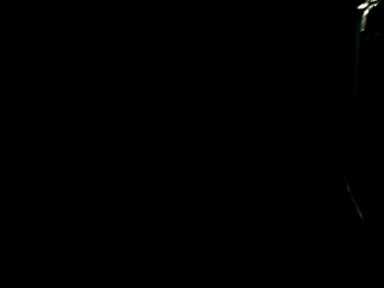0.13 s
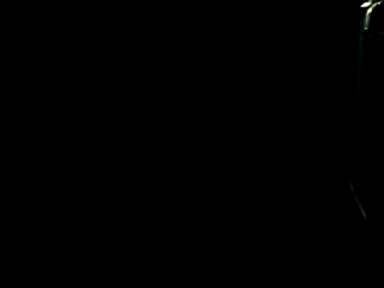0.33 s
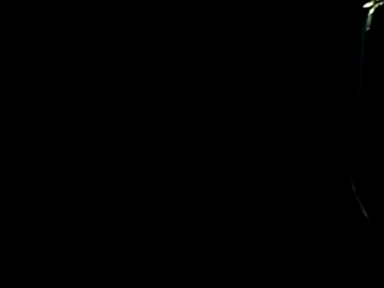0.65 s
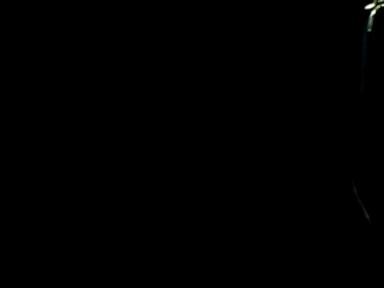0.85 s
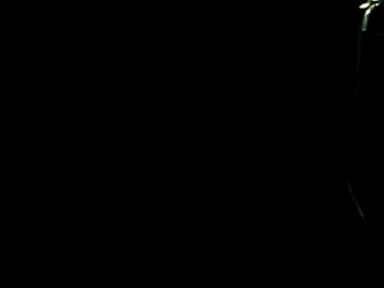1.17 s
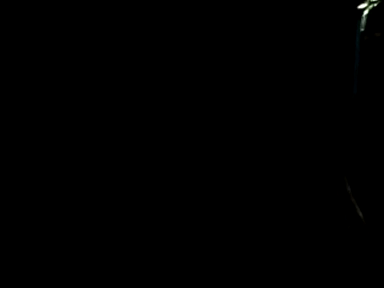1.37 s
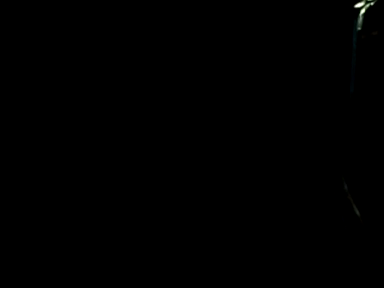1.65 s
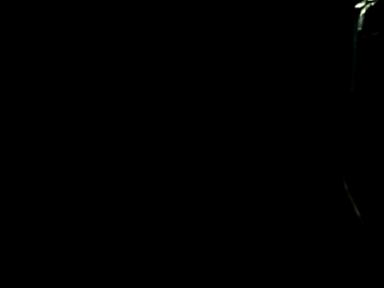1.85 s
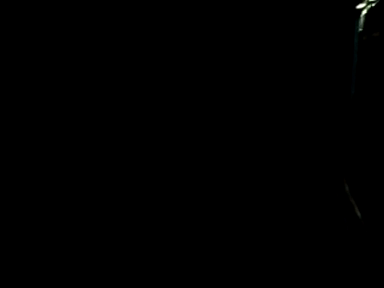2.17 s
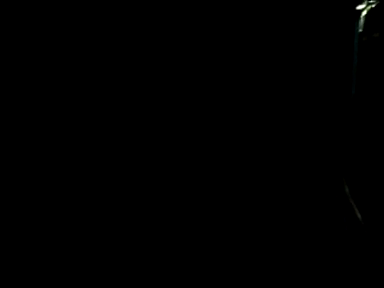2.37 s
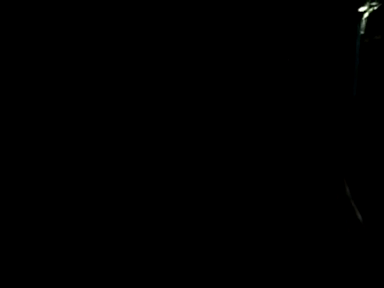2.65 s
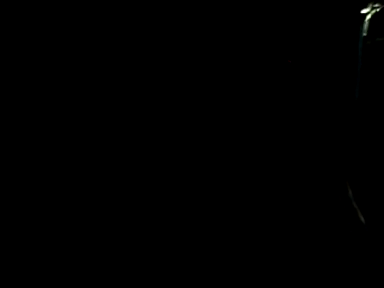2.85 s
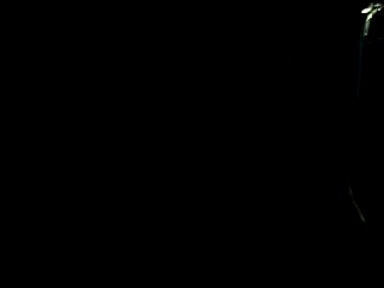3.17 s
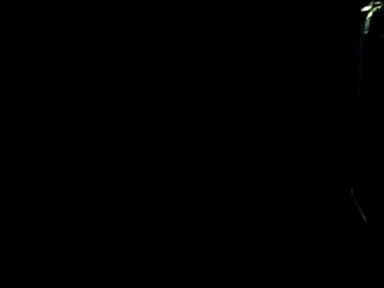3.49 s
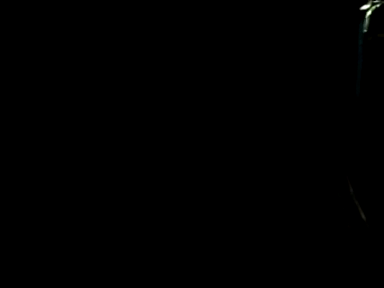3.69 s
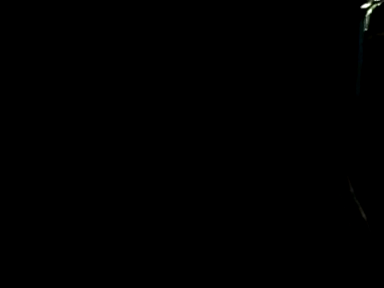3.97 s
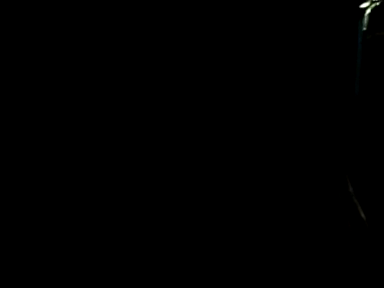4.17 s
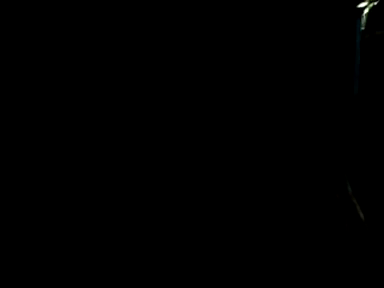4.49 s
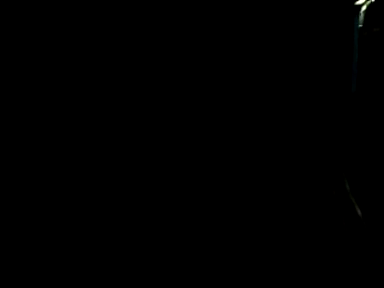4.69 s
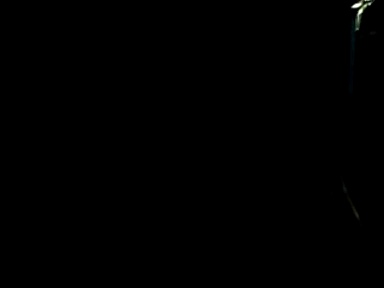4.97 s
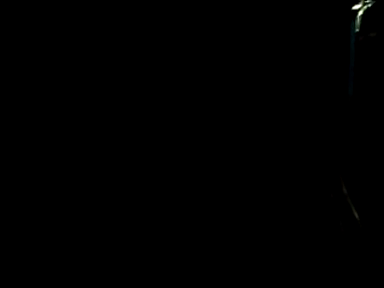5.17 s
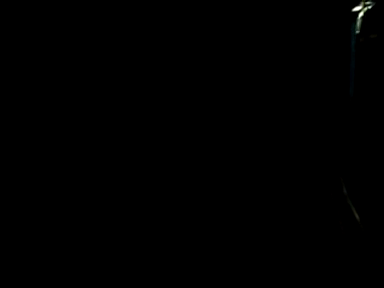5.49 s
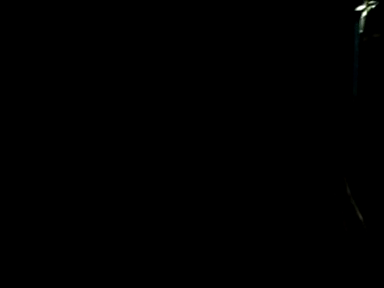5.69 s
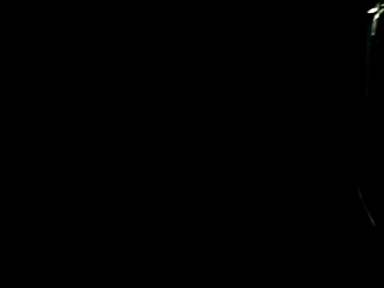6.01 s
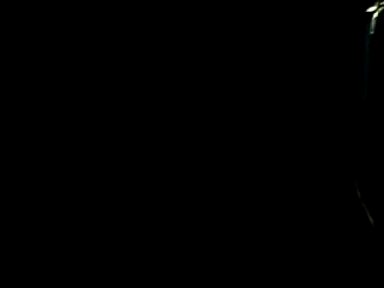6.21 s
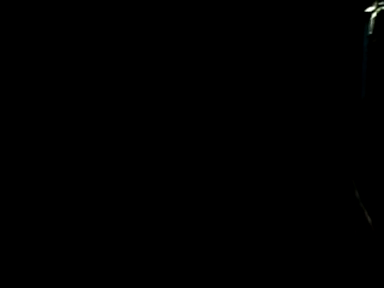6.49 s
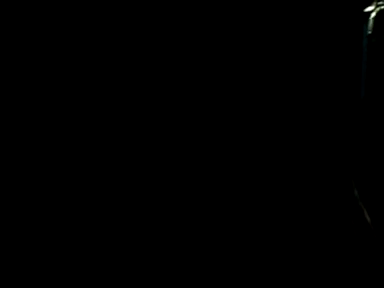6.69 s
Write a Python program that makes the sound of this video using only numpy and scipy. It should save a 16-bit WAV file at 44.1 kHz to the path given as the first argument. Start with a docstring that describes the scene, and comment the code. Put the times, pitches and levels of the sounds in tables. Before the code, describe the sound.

A train coach runs over rough track, heard from inside. A low rumble, a light hiss and faint singing steel continue throughout, swelling and easing slightly. After a soft stutter of knocks and small rattles at the start, hard wheel clacks land at about 1, 1.5 and 2.4 seconds. Each shakes loose metal fittings into a bright, jingling rattle, makes the coach body boom and leaves the rail faintly ringing. Another clack near 2.9 seconds runs straight into a quick burst of hollow knocks, and similar bursts come at about 3.4, 4.4 and 4.9 seconds. Softer, duller thumps fall unevenly between 4 and 6 seconds, with stray rattles among them. A firmer clack with a small metallic ring arrives at 6.4 seconds, followed by two lighter knocks as the rolling carries on to about 7 seconds.

```python
"""Train wheels hit rail joints in single clacks and stutter over worn patches in short runs of knocks,
heard inside a railway coach on rough track at night. Each blow shakes loose metal fittings into a
bright rattle and sets the coach body booming; hard clacks also leave the rail ringing.
Underneath are the steady rumble and hiss of rolling."""
import sys
import numpy as np
from scipy import signal
from scipy.fft import rfft, irfft, next_fast_len
from scipy.io import wavfile
from scipy.ndimage import uniform_filter1d

SR = 44100
rng = np.random.default_rng(int(sys.argv[2]) if len(sys.argv) > 2 else 0)


def transcribe(u):
    """Save the signal u as a 16-bit wav file named by the first command-line argument.

    u: samples, shape (n,) or (channels, n), limited to [-1, 1]; the rate is SR.
    q: integer samples, one column per channel.
    """
    v = np.clip(np.atleast_2d(u).T, -1, 1)
    q = np.round(v * 32767).astype(np.int16)
    wavfile.write(sys.argv[1], SR, q)


N = 302085
TIME = np.arange(N) / SR


def from_db(db):
    """Turn decibels into a gain."""
    return 10 ** (np.asarray(db) / 20)


def unit_power(x):
    """Scale a sound to an average power of one."""
    return x / np.sqrt(np.mean(x ** 2) + 1e-20)


def evened(x, span_s):
    """Hold the power near one over every short span."""
    return x / np.sqrt(np.abs(uniform_filter1d(x ** 2, int(span_s * SR))) + 1e-20)


def in_time(rows):
    """Join timed rows with straight lines, one curve per level column."""
    times, *columns = np.transpose(rows)
    return [np.interp(TIME, times, column) for column in columns]


def colour(x, spectrum, peaks=()):
    """Filter a sound with a smooth tone curve and resonant peaks on top."""
    size = 2 * next_fast_len(x.shape[-1] // 2 + SR // 16)
    hz = np.maximum(np.arange(size // 2 + 1) * SR / size, 1)
    points = np.array(spectrum)
    db = np.interp(np.log(hz), np.log(points[:, 0]), points[:, 1])
    for centre, width, lift in peaks:
        db = db + lift / (1 + (2 * (hz - centre) / width) ** 2)
    # Minimum phase: nothing rings before it is hit.
    cepstrum = irfft(db * np.log(10) / 20)
    cepstrum[1:size // 2] *= 2
    cepstrum[size // 2 + 1:] = 0
    return irfft(rfft(x, size) * np.exp(rfft(cepstrum)), size)[..., :x.shape[-1]]


def resonate(x, hz, width_hz):
    """Ring at one pitch, with a gain of one at the peak."""
    radius = np.exp(-np.pi * width_hz / SR)
    feedback = [1, -2 * radius * np.cos(2 * np.pi * hz / SR), radius ** 2]
    return signal.lfilter(np.array([1, 0, -1]) * (1 - radius ** 2) / 2, feedback, x + 1e-18)


def noise_bursts(count, rise_s, t60, tail_db, tail_t60):
    """Noise that swells, dies and leaves a weaker tail; t60 is the seconds it takes to fall 60 dB."""
    t = TIME[:SR // 2]
    fall = from_db(-60 * t / t60) + from_db(tail_db - 60 * t / tail_t60)
    return rng.standard_normal((count, len(t))) * (1 - np.exp(-t / rise_s)) * fall


def placed(bursts, times, levels_db):
    """Lay each burst at its time; its level is its energy spread over 20 ms."""
    out = np.zeros(N)
    for s, burst, db in zip(times, bursts, levels_db):
        start = int(s * SR)
        burst = burst * from_db(db) * np.sqrt(.02 * SR / np.sum(burst ** 2))
        out[start:start + len(burst)] += burst[:N - start]
    return out


def grains(per_s, spread_db):
    """Tiny random contacts of uneven size."""
    touches = rng.random(N) < per_s / SR
    return touches * rng.standard_normal(N) * from_db(spread_db * rng.standard_normal(N))


# Steel parts that sing. Each row: pitch in Hz, relative level in dB.
STEEL_TONES = [(1640, -4.5), (1945, -11), (2525, -13.5), (2920, -22), (3190, -21), (4100, -13), (4850, -18)]


def singing_steel():
    """Steel parts sing with the rolling, each growing louder and softer at random."""
    out = np.zeros(N)
    for hz, db in STEEL_TONES:
        wander = np.interp(TIME * 4.3, np.arange(400), rng.standard_normal(400))  # 4.3 turns a second
        tone = unit_power(resonate(rng.standard_normal(N), hz, width_hz=34))
        out += from_db(db + 7 * wander) * tone
    return out


# Floor and wall panels that roar and knocks pass through. Each row: pitch in Hz, width in Hz, lift in dB.
PANEL_PEAKS = [(214, 26, 3.5), (256.8, 21.6, 6.5), (305.6, 23, 3.5), (353.4, 9.8, 5.5), (412, 10, 6),
               (495, 23, 2), (850, 43, -2), (1370, 60, -0.5), (1520, 80, 5.5)]
# Tone curves of the roar and the hiss. Each row: frequency in Hz, relative level in dB.
ROAR_CURVE = [(20, -30), (100, -5), (170, 0.5), (260, -2), (380, -5.5), (520, -7.5), (800, -12),
              (1150, -22), (1700, -34.5), (2600, -36.5), (4500, -39), (11000, -86.5)]
HISS_CURVE = [(300, -3.5), (1500, 4), (3200, -1.5), (4200, -4), (4900, -7.5), (6000, -8), (8000, -6.5),
              (9000, -9.5), (9900, -6.5), (11000, -27)]
# How strong the rolling is. Each row: time in seconds, then roar and hiss in relative dB.
ROLLING_LEVELS = [(0.0, -34.5, -48), (0.36, -34, -45), (0.92, -33, -47.5), (1.18, -37, -51),
                  (1.95, -39, -52.5), (2.61, -34, -46.5), (2.96, -33, -48.5), (3.97, -36.5, -52.5),
                  (4.48, -33, -47.5), (5.36, -34.5, -48.5), (6.62, -32.5, -46.5), (6.85, -32, -48)]


def rolling():
    """Rough wheel treads roar through the panels; small parts fizz and sing with the shaking."""
    roar_db, hiss_db = in_time(ROLLING_LEVELS)
    roar = evened(colour(grains(per_s=9000, spread_db=1.27), ROAR_CURVE, PANEL_PEAKS), span_s=0.089)
    hiss = unit_power(colour(grains(per_s=25000, spread_db=3.5), HISS_CURVE))
    singing = from_db(hiss_db - 9.5) * singing_steel()
    return from_db(roar_db + .5) * roar + from_db(hiss_db - .5) * hiss + singing


def coach_body(modes, span_s):
    """Uneven rails keep the low resonances of the coach going."""
    boom = sum(from_db(db) * resonate(rng.standard_normal(N + SR), hz, width) for hz, width, db in modes)
    lowpass = signal.butter(2, 1.28 * modes[-1][0], fs=SR, output="sos")
    return evened(signal.sosfilt(lowpass, boom)[SR:], span_s)


def jolt_swell(times, force_db, rise_s, t60=1.0):
    """The heavy body takes up each blow slowly and gives it back slowly; the energies add."""
    t = TIME[:SR]
    response = (1 - np.exp(-t / rise_s)) * from_db(-60 * t / t60)
    energy = np.bincount((times * SR).astype(int), from_db(force_db) ** 2, N)
    return np.sqrt(np.abs(signal.fftconvolve(energy, response ** 2)[:N]))


# The body's boom and deeper heave. Each row: pitch in Hz, width in Hz, relative level in dB.
BODY_BOOM = [(84.1, 7.8, -2), (112.4, 6.3, -1)]
BODY_HEAVE = [(27.3, 15, 1.5), (43.2, 6, 9)]
# Dips where the coach lurches on its springs. Each row: start in seconds, strength in dB.
TRACK_DIPS = [(.98, -23), (1.46, -23), (2.54, -28), (3.44, -23), (4.62, -28), (6.51, -24.5)]


def rumble(times, jolt_db):
    """The body booms and heaves with the rolling and swells after each jolt; dips add to the heave."""
    roar_db, _ = in_time(ROLLING_LEVELS)
    shake = jolt_swell(times, jolt_db, rise_s=0.015)
    lurch = jolt_swell(*np.transpose(TRACK_DIPS), rise_s=0.014)
    sway = np.hypot(lurch, from_db(-12) * shake)
    boom = np.hypot(from_db(roar_db - 3), shake) * coach_body(BODY_BOOM, span_s=0.15)
    heave = np.hypot(from_db(roar_db - 2), sway) * coach_body(BODY_HEAVE, span_s=0.11)
    return boom + heave


# Single metal parts that tick or ring. Each row: start in seconds, pitch in Hz, width in Hz,
# level in dB, rise in seconds, seconds to fall 60 dB.
METAL_CHINKS = [(3.362, 3120, 2200, -45.5, .001, 0.02), (3.94, 4540, 220, -54, .015, 0.27),
                (6.401, 3330, 110, -41, .005, 0.56)]


def chinks(rows):
    """Each steel part rings in a cluster of close pitches that beat together."""
    t, bursts = TIME[:SR], []
    for _, hz, width, _, rise_s, t60 in rows:
        half_width = np.clip(width, .03 * hz, 1.2 * hz) / 2
        band = signal.butter(2, [hz - half_width, hz + half_width], "band", fs=SR, output="sos")
        cluster = signal.sosfilt(band, rng.standard_normal(2 * SR))[SR:]
        bursts.append(evened(cluster, span_s=.06) * (1 - np.exp(-t / rise_s)) * from_db(-60 * t / t60))
    return placed(bursts, [row[0] for row in rows], [row[3] for row in rows])


def loose_parts(bursts, curve, range_hz, width_hz, lift_db, count):
    """Every burst sets a different handful of parts ringing."""
    pitches = rng.uniform(*range_hz, (len(bursts), count))
    return [colour(burst, curve, [(hz, width_hz, lift_db) for hz in row])
            for burst, row in zip(bursts, pitches)]


# Tone curves of the loose fittings. Each row: frequency in Hz, relative level in dB.
RATTLE_CURVE = [(200, -16), (800, 6.5), (1700, 4), (2400, 1.5), (3300, 2.5), (4300, -1), (4900, 0.5),
                (5900, -3.5), (6900, -7.5), (7600, -3), (10500, -29.5)]
JINGLE_CURVE = [(1000, -41), (5000, -6.5), (7500, -7), (8900, 2), (9400, 1.5), (10000, 2), (10600, -7),
                (12000, -47)]
# Fittings that shift between blows. Each row: start in seconds, then rattle and jingle in relative dB.
STRAY_RATTLES = [(.29, -45, -69), (.58, -41, -45), (0.908, -39.5, -47), (2.359, -38, -44), (4.65, -52, -54),
                 (4.824, -44.5, -46), (5.045, -38.5, -49), (5.591, -49, -54), (5.839, -36.5, -41),
                 (6.24, -59, -49.5), (6.589, -55, -45)]


def fittings(times, rattle_db, jingle_db):
    """Loose metal rattles after a jolt; the lightest parts swell later and jingle."""
    shakes = noise_bursts(len(times), rise_s=0.012, t60=0.33, tail_db=-15.5, tail_t60=0.73)
    rattle = loose_parts(shakes, RATTLE_CURVE, range_hz=(1204, 8470), width_hz=74, lift_db=5.5, count=16)
    shivers = noise_bursts(len(times), rise_s=0.02, t60=0.44, tail_db=-19, tail_t60=0.79)
    jingle = loose_parts(shivers, JINGLE_CURVE, range_hz=(9140, 10300),
                         width_hz=110, lift_db=3.5, count=5)
    return placed(rattle, times, rattle_db + 0.46) + placed(jingle, times, jingle_db)


# The struck rail. Each row: pitch in Hz, width in Hz, level in dB relative to the crack,
# rise in seconds, seconds to fall 60 dB.
RAIL_TONES = [(2107, 83, -25.5, 0.03, 0.95), (6880, 310, -25, 0.056, 0.55)]


def rail_ring(clacks, hard_crack_db=-29):
    """The rail rings on after each hard clack, in proportion to its crack."""
    return chinks([(s, hz, width, crack_db + db, rise_s, t60)
                   for s, _, crack_db, *_ in clacks if crack_db > hard_crack_db
                   for hz, width, db, rise_s, t60 in RAIL_TONES])


def with_push(bursts, push_db, delay_s):
    """The wheel's own push stands out of the scattered ringing as one sharp pulse."""
    pulse = np.arange(bursts.shape[1]) == int(delay_s * SR)
    return bursts + from_db(push_db) * np.linalg.norm(bursts, axis=1, keepdims=True) * pulse


# Tone curve of a hollow knock. Each row: multiple of its pitch, relative level in dB.
KNOCK_CURVE = [(.17, -39.5), (.43, -13.5), (.72, -1), (1.1, 0), (1.6, -5.5), (2.1, -19.5), (3.1, -26.5),
               (7, -43.5), (23, -84)]
# Tone curve of the crack on a rail end. Each row: frequency in Hz, relative level in dB.
CRACK_CURVE = [(100, -5), (180, 11), (300, -16.5), (550, 4.5), (900, 1.5), (1150, -7.5), (1800, -13),
               (2500, -18), (10000, -36.5)]


def wheel_blows(times, knock_db, crack_db, pitch_hz):
    """A hollow knock comes through the floor as the wheel dips; a square hit on a rail end cracks."""
    dip_s = .004
    thuds = noise_bursts(len(times), rise_s=0.00053, t60=0.2, tail_db=-4.0, tail_t60=0.27)
    thuds = with_push(thuds, push_db=-4.5, delay_s=0.00599)
    knocks = [colour(thud, np.array(KNOCK_CURVE) * [hz, 1], PANEL_PEAKS)
              for thud, hz in zip(thuds, pitch_hz)]
    snaps = noise_bursts(len(times), rise_s=0.00057, t60=0.099, tail_db=-9.5, tail_t60=0.18)
    snaps = with_push(snaps, push_db=-12.5, delay_s=0.00144)
    cracks = colour(snaps, CRACK_CURVE, PANEL_PEAKS)
    return placed(knocks, times - dip_s, knock_db + .5) + placed(cracks, times, crack_db + .4)


def grazes(clacks, lead_s=.013):
    """The wheel brushes the dipped rail end just before it strikes, blurring the start of the clack."""
    times, knock_db, crack_db, *_, pitch_hz, graze_db = np.transpose(clacks)
    return wheel_blows(times - lead_s, knock_db + graze_db, crack_db + graze_db, pitch_hz)


# Single clacks at rail joints. Each row: start in seconds, five relative levels in dB (knock, crack,
# rattle, jingle, jolt to the body), knock pitch in Hz, graze in dB relative to the clack.
JOINT_CLACKS = [(0.972, -14.5, -14.5, -27, -27.5, -24, 332, -20),
                (1.455, -16.5, -15, -28.5, -32, -23, 410, -35),
                (2.395, -15.5, -16.5, -27.5, -29.5, -31, 376, -9),
                (2.885, -19.5, -24, -33, -34.5, -34, 360, -8.5),
                (4.095, -23.5, -38.5, -40, -46.5, -27.5, 260, -4),
                (4.598, -25, -38, -38.5, -47, -26.5, 293, -28),
                (5.277, -28.5, -40, -39.5, -40.5, -30.5, 248, -1),
                (5.776, -26.5, -34, -39, -44.5, -26, 305, -19),
                (6.399, -20, -23, -34.5, -35.5, -22.5, 293, -8.5),
                (6.547, -23.5, -30.5, -42, -34.5, -24.5, 347, -7),
                (6.738, -24.5, -34.5, -41, -43.5, -31, 252, -4.5)]
# Runs of knocks on worn rail. Each row: start in seconds, the same five levels, first pitch in Hz,
# seconds between knocks.
WORN_RUNS = [(0.11, -22, -35, -41.5, -46, -42, 312, 0.028),
             (2.917, -12.5, -24, -29, -35.5, -24.5, 399, 0.028),
             (3.41, -13.5, -31.5, -36, -42, -31.5, 404, .029),
             (4.37, -17.5, -28.5, -29, -38, -29, 437, 0.027),
             (4.885, -17.5, -43, -37.5, -43.5, -37, 380, 0.028),
             (5.904, -25.5, -31, -38, -40.5, -29, 262, .012)]


def all_blows(knocks_per_run=4, fade_db=0.24, pitch_kept=0.95):
    """List the clacks, and each run as evenly spaced knocks that sink in pitch and strength."""
    knocks = [(s + k * gap_s, *(np.array(levels_db) - k * fade_db), hz * pitch_kept ** k)
              for s, *levels_db, hz, gap_s in WORN_RUNS for k in range(knocks_per_run)]
    return np.array([row[:-1] for row in JOINT_CLACKS] + knocks)


def scene():
    """Blows, rattles and ringing steel over the rolling and the rumble."""
    times, knock_db, crack_db, rattle_db, jingle_db, jolt_db, pitch_hz = all_blows().T
    blows = wheel_blows(times, knock_db, crack_db, pitch_hz)
    blows += grazes(JOINT_CLACKS) + rail_ring(JOINT_CLACKS)
    metal = fittings(times, rattle_db, jingle_db)
    metal += fittings(*np.transpose(STRAY_RATTLES)) + chinks(METAL_CHINKS)
    return (blows + metal + rolling() + rumble(times, jolt_db))[None]


def record(dry):
    """Round off the loudest peaks and cut the highest treble."""
    ceiling, cutoff_hz = 1.3, 10650
    lowpass = signal.ellip(10, .2, 70, cutoff_hz, fs=SR, output="sos")
    return signal.sosfilt(lowpass, ceiling * np.tanh(dry / ceiling))


dry = scene()
out = record(dry)
transcribe(out)
```